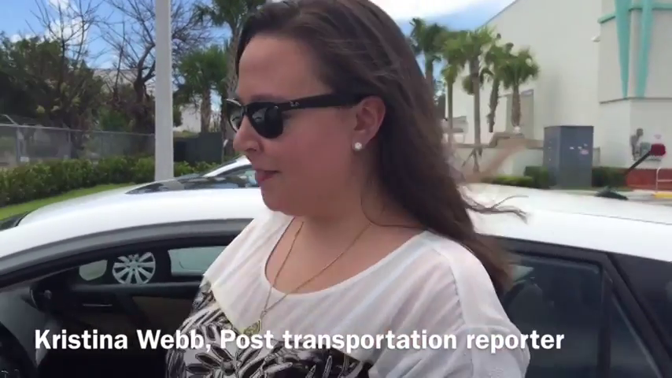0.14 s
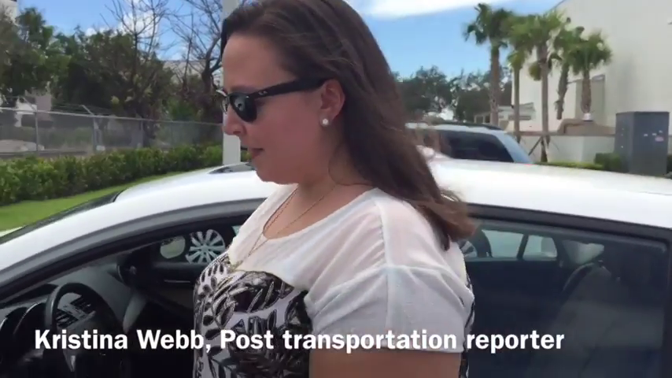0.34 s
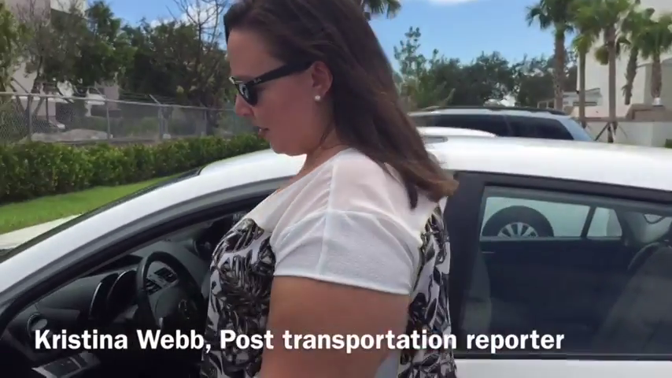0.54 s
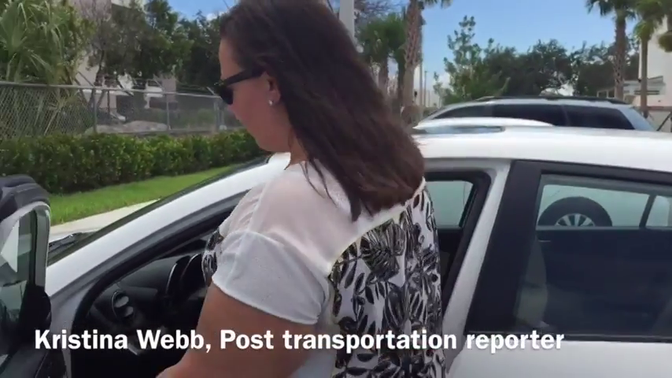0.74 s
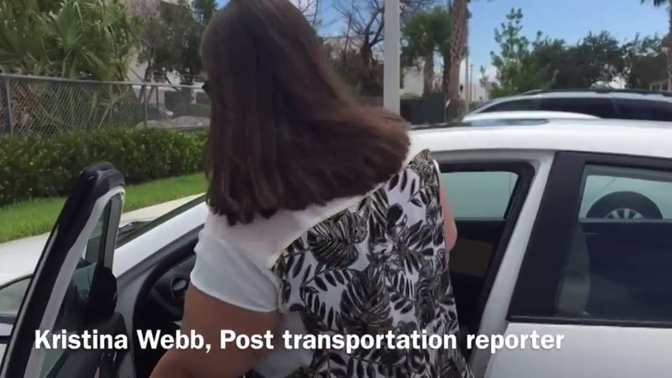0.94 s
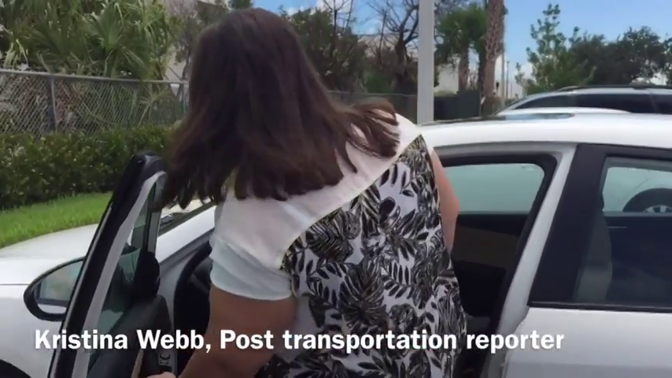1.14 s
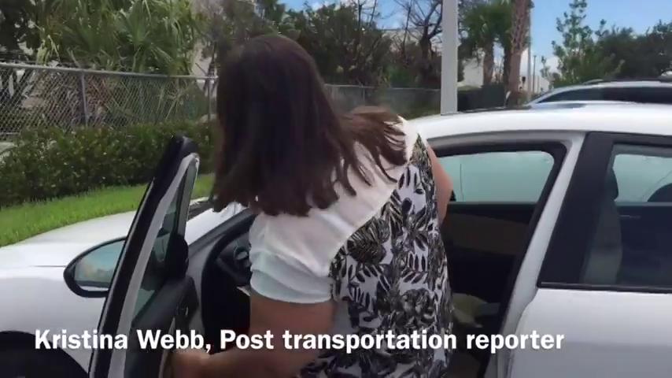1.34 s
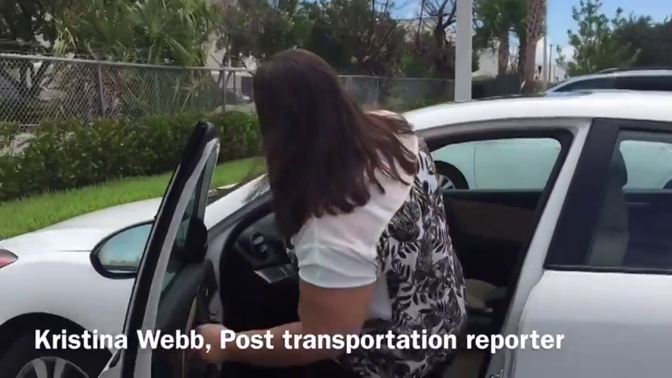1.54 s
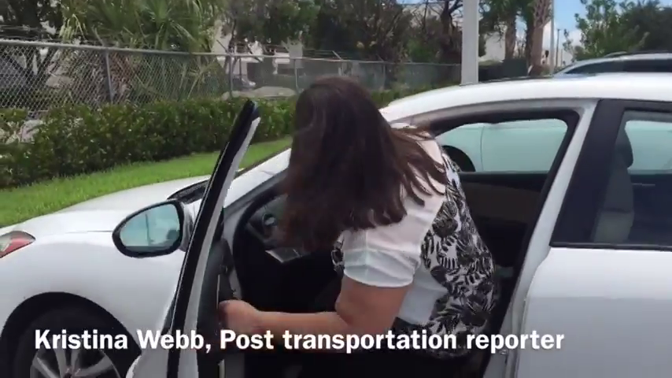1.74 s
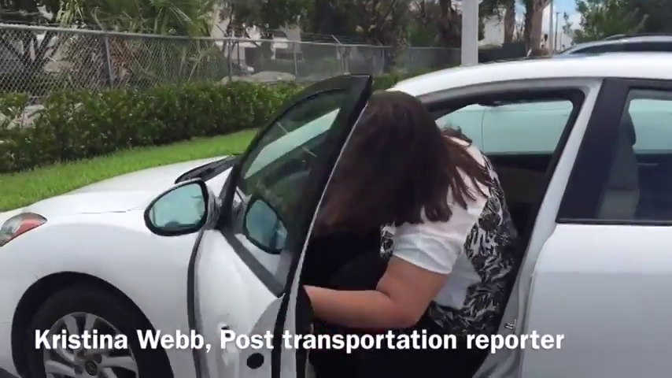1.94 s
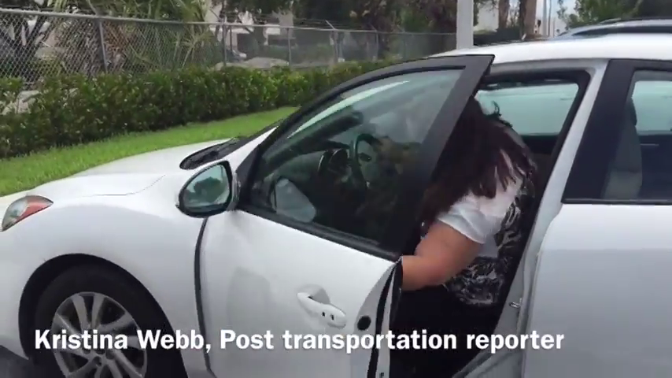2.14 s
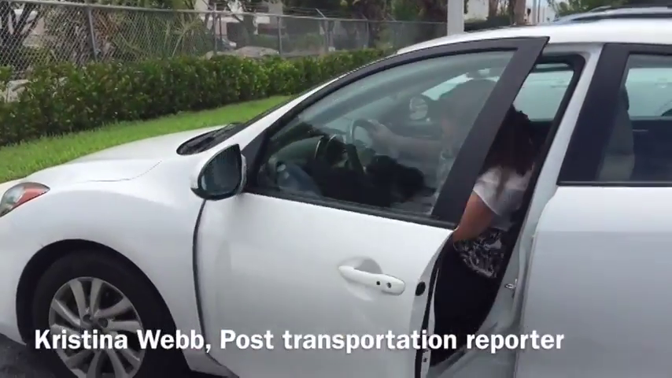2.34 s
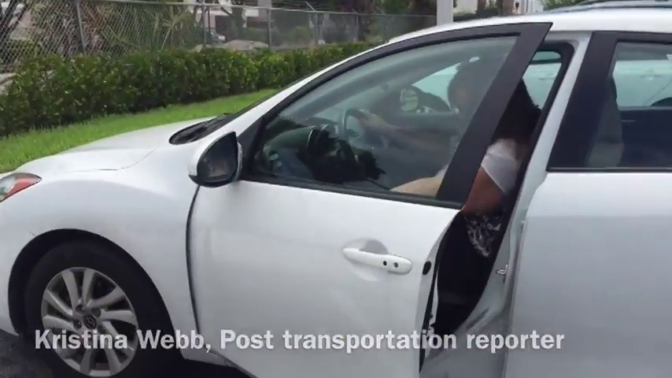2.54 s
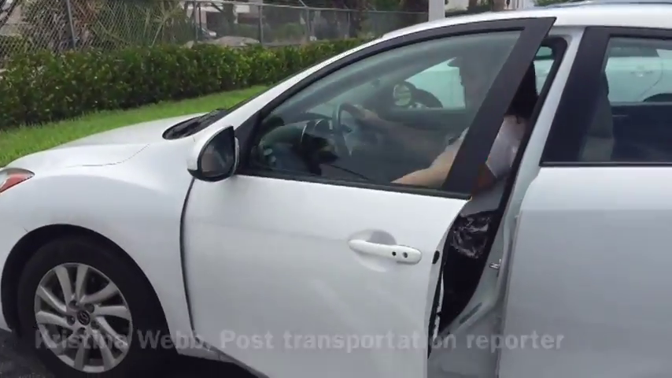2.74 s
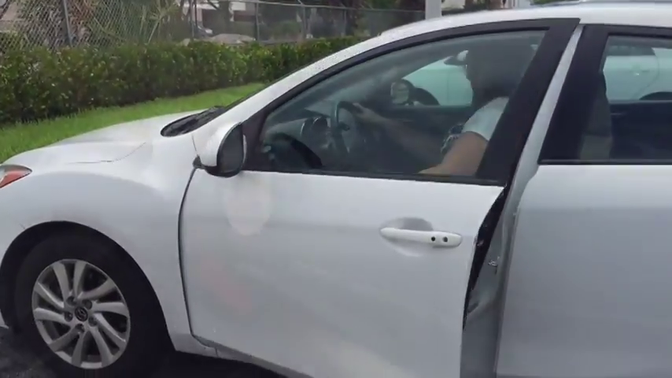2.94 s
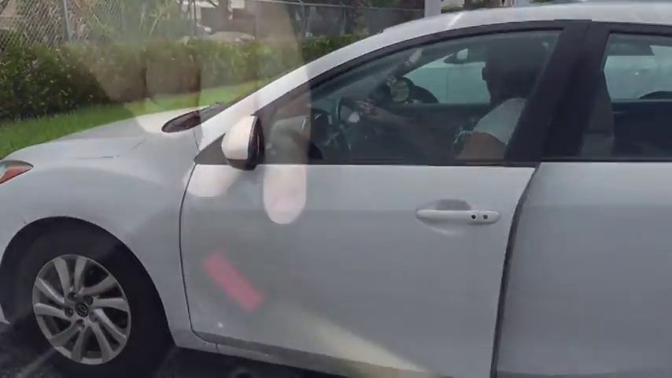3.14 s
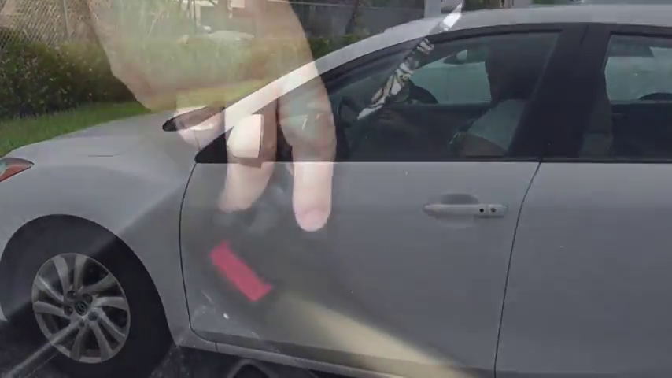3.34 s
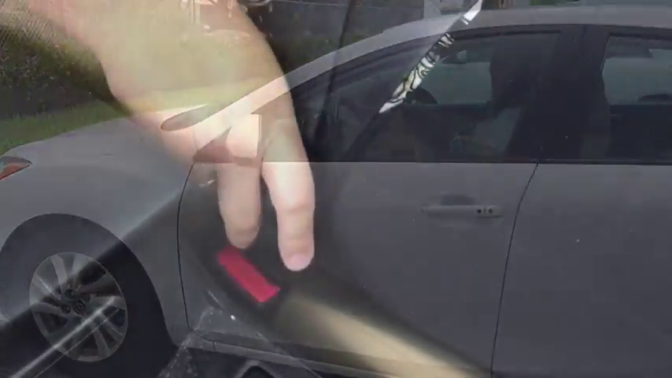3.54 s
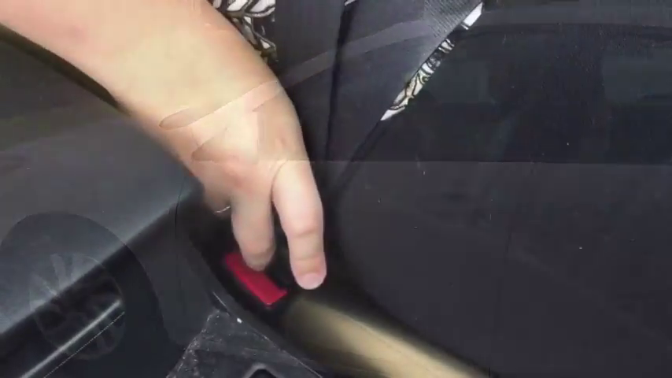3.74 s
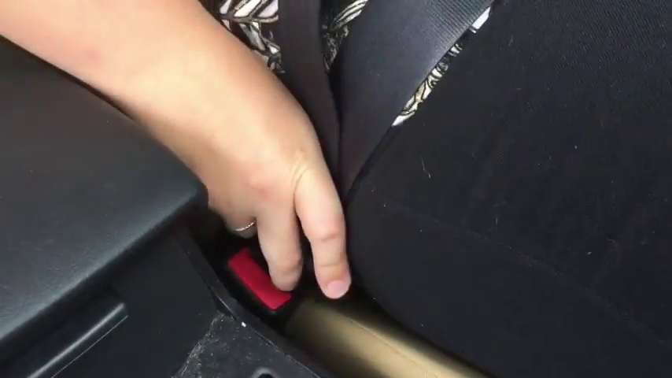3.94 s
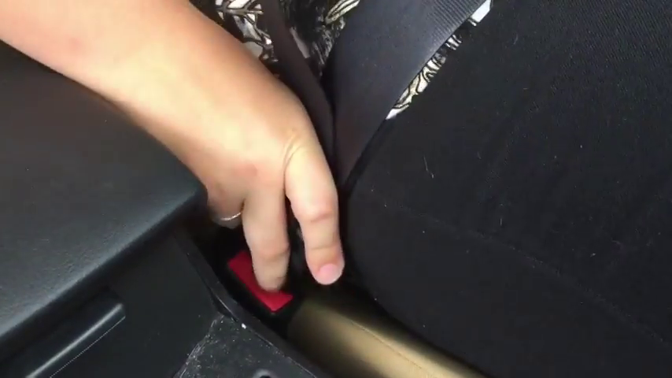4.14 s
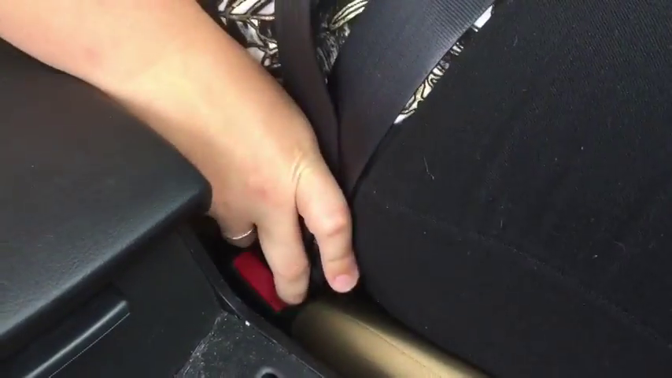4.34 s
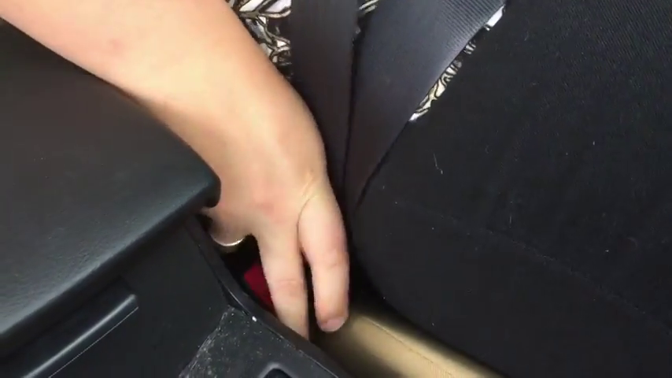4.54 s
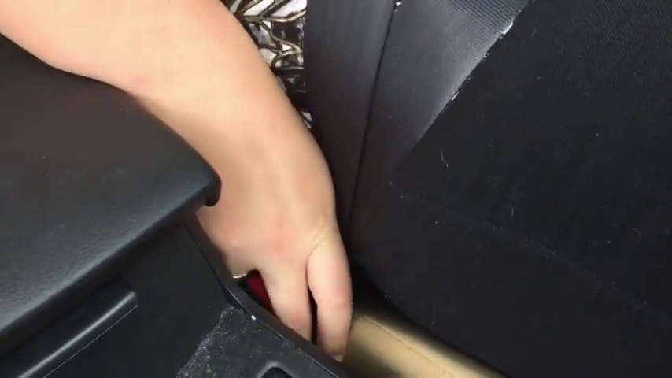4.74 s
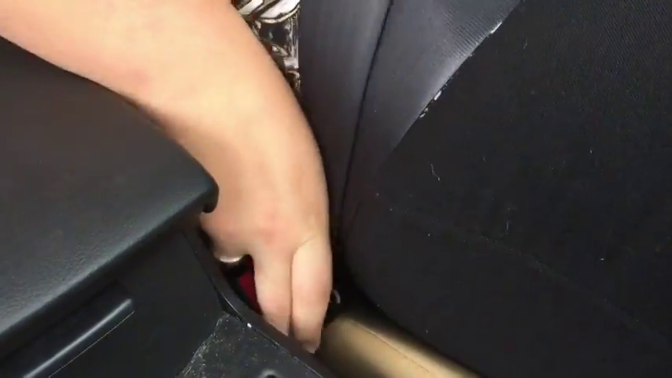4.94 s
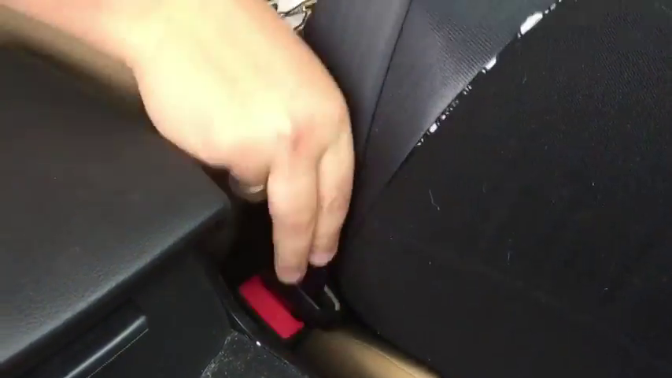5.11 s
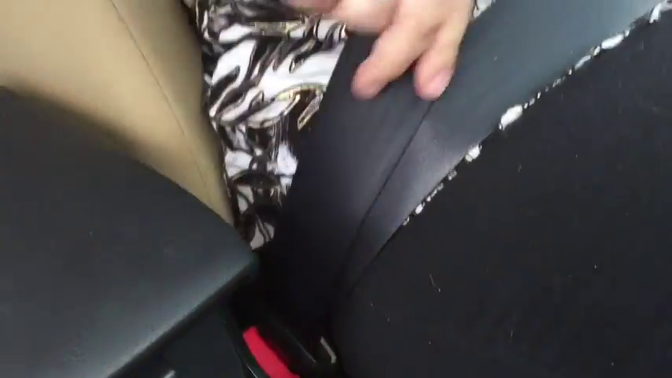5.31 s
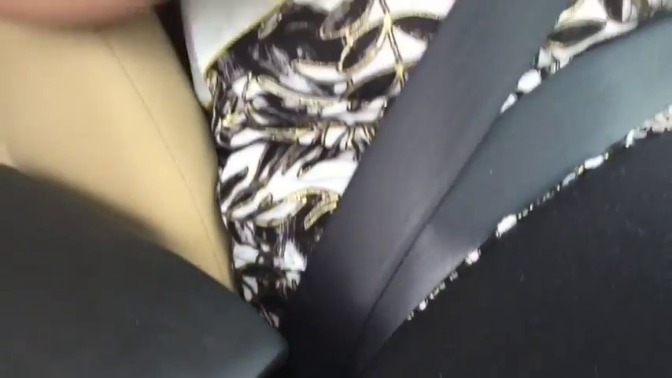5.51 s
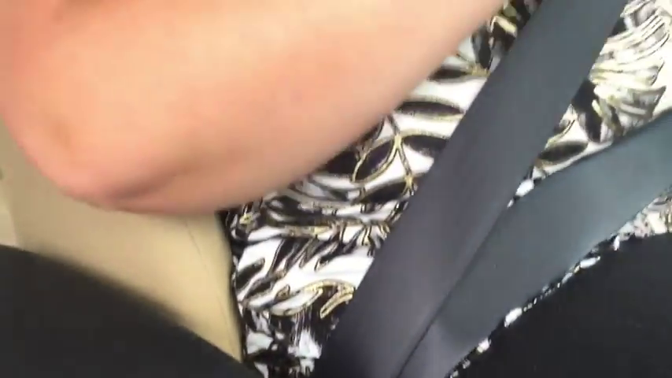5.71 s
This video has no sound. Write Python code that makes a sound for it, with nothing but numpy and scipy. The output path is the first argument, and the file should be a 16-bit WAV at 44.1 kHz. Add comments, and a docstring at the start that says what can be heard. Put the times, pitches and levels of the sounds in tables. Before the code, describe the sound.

Car engine running, dry door-hinge cracks, a heavy door slam, then knocks on a seat belt buckle, a loud latch snap and cloth rubbing.

```python
"""A small car idles in a parking lot while the driver climbs in and pulls the creaking door: noise scuffs, dry cracks.
The door slams: struck metal modes ring over bursts of noise. Meanwhile the sound cross-fades to the cabin,
where the idle is a low drone of shaped noise and steady tones. Fingers knock on the seat belt buckle, its steel
latch snaps loudly (both are ringing modes with noise), and the webbing slides over clothes as grainy noise."""
import sys
import numpy as np
from scipy import signal
from scipy.fft import rfft, irfft, next_fast_len
from scipy.io import wavfile

SR = 44100
rng = np.random.default_rng(int(sys.argv[2]) if len(sys.argv) > 2 else 0)


def to_wav(s):
    """Save 16-bit WAV."""
    ch = np.atleast_2d(s).T  # columns
    pcm = np.round(np.clip(ch, -1, 1) * 32767)  # PCM
    wavfile.write(sys.argv[1], SR, pcm.astype(np.int16))


N = 258867
TIME = np.arange(N) / SR
RING = TIME[:SR // 2]  # half a second, the time axis of every struck sound
TOP_HZ = 15900  # top of the recorder's range

# blows of the slam: t/s, latch level/dB, loose parts level/dB, panel level/dB
SLAM_BLOWS = [(3.38, -32, -27, -36), (3.398, -6, -16.5, -24.5), (3.401, -9, -15, -17),
              (3.413, -31, -31, -23), (3.4284, -30, -23.5, -29), (3.436, -31, -31, -40),
              (3.47, -47, -39, -39), (3.496, -50, -40, -40)]
# ringing shapes of the door's sheet metal: f/Hz, level/dB, t60/s
PANEL_MODES = [(50, -2.5, 0.38), (74, -4.5, 0.23), (122.6, -2, 0.216), (170, 2.5, 0.24), (239, -5, 0.16),
               (322.6, -6, 0.24), (383, -9.5, 0.11), (480, -20, 0.18), (678, -10.5, 0.16)]
# ringing shapes of the door latch: f/Hz, level/dB, t60/s
LATCH_MODES = [(833, 4, 0.026), (955, 7, 0.023), (1066, 9, 0.027), (1158, 7, 0.029), (1283, 3, 0.019),
               (1455, 1, 0.018), (1600, 1.5, 0.024), (4140, -7, 0.03)]
# noise of the loose parts in the door: f/Hz, level/dB
LOOSE_SPECTRUM = [(200, 6), (600, 0), (1000, -4), (1550, 2.5), (2100, -10.5), (2900, -11.5), (4500, -15),
                  (7000, -25.5), (11000, -29), (16000, -39)]


def door_slam():
    """The latch catches in two hard clacks, the panel booms and loose parts inside the door rattle after it."""
    out = np.zeros(N)
    cushion = np.minimum(RING / 0.0025, 1)  # the seal spreads each blow over a few milliseconds
    for s, latch_db, loose_db, panel_db in SLAM_BLOWS:
        loose = noise(LOOSE_SPECTRUM, size=len(RING)) * (decay(0.03) + undb(-15) * decay(0.15))
        latch = ring(LATCH_MODES, detune=0.017)
        panel = ring(PANEL_MODES, detune=0.019)
        blow = undb(latch_db) * latch + undb(loose_db) * loose + undb(panel_db) * panel
        add(out, s, cushion * blow)
    return out


# rubbing of door, hinge and seat: t/s at the peak, level/dB, t60/s, brightest f/Hz, fall-off in dB per octave
SCUFF_EVENTS = [(0.679, -41.5, 0.31, 400, 72), (1.104, -39, 0.082, 1900, 13), (1.252, -40, 0.17, 1500, 9.5),
                (1.59, -36, 0.1, 370, 14), (1.734, -37.5, 0.12, 3200, 6), (1.761, -34, .17, 4400, 4),
                (1.779, -35.5, 0.088, 1400, 6), (1.932, -39, 0.2, 1600, 9), (1.972, -46.5, .1, 4000, 16),
                (2.066, -44, .12, 850, 12)]
# sharp cracks of the door's hinge stop: t/s, level/dB, brightest f/Hz
HINGE_CRACKS = [(1.0988, -33, 3800), (1.115, -37, 4500), (1.733, -25, 4600), (1.739, -33, 3800),
                (1.7513, -17, 4600), (1.7558, -26, 7000), (1.761, -17.5, 4500), (1.7659, -22, 4000),
                (1.772, -19.5, 1300), (1.7763, -28, 2400), (1.782, -27, 4000), (1.793, -25, 2000)]
# ringing shapes of the hinge stop: f/Hz, level/dB, t60/s
HINGE_MODES = [(1400, 7, 0.0048), (2150, 0, .006), (3590, -4.5, 0.0092), (4660, 0, 0.0051),
               (5640, -7, 0.0048), (7750, 1, 0.0043), (8600, 1, 0.0049), (10400, 0.5, 0.0033)]
SCUFF_RISE_SHARE, SCUFF_GRAIN_DB = .11, 2  # rise time as a share of the t60; roughness
CRACK_T60_S, CRACK_SLOPE_DB = .007, 6.5  # slope per octave away from the brightest range
CRACK_GRIT_DB = -11  # noise beside the modes
SKIN_HZ, SKIN_DB, DOOR_TOP_HZ = 1450, -4.5, 11600


def door_handling():
    """Grainy scuffs swell and die away; the hinge stop lets go in a few dry cracks."""
    out = np.zeros(N)
    for s, db, t60, hz, slope_db in SCUFF_EVENTS:
        rise_s = SCUFF_RISE_SHARE * t60
        # the factor makes the decay meet the rise at full level
        envelope = np.minimum(RING / rise_s, decay(t60) * 1000 ** SCUFF_RISE_SHARE)
        add(out, s - rise_s, undb(db) * burst(hz, slope_db) * envelope)
    out = out * unit(undb(SCUFF_GRAIN_DB * walk(600)))
    for s, db, hz in HINGE_CRACKS:
        grit = undb(CRACK_GRIT_DB) * burst(hz, CRACK_SLOPE_DB) * decay(CRACK_T60_S)
        crack = ring(HINGE_MODES, hz, CRACK_SLOPE_DB, detune=0.035) + grit
        add(out, s, undb(db) * crack)
    # the door skin is shaken too, which gives each sound some body
    skin = undb(SKIN_DB) * dull(out, SKIN_HZ, order=1)
    return dull(out, DOOR_TOP_HZ, order=3) + skin


# rattles of handle and trim: t/s, level/dB
TRIM_RATTLES = [(1.238, -33), (1.2455, -33), (1.2505, -32), (1.257, -37), (1.9225, -36), (1.9284, -25),
                (1.942, -32), (3.555, -40), (3.564, -36)]
# ringing shapes of the trim: f/Hz, level/dB, t60/s
TRIM_MODES = [(1000, -2, 0.015), (1300, -5, 0.017), (1850, -2, 0.016), (2105, 2, 0.026), (2330, -1, 0.026),
              (2440, -3, 0.021)]
BOUNCE_S, BOUNCE_DB = .003, -6.5  # a loose part strikes again, weaker each time


def door_trim():
    """Handle and plastic door trim chatter in short hollow knocks, each with two uneven bounces."""
    out = np.zeros(N)
    soft_start = np.minimum(RING / .001, 1)
    for s, db in TRIM_RATTLES:
        for bounce in range(3):
            late_s = BOUNCE_S * bounce * rng.uniform(.75, 1.25)
            gain = undb(db + bounce * BOUNCE_DB)
            add(out, s + late_s, gain * ring(TRIM_MODES, detune=.03) * soft_start)
    return out


# the rubber seal slips as the door settles: t/s at the middle, length/s, level/dB, pitch f/Hz
SEAL_GRUNTS = [(3.453, .02, -40, 430), (3.474, 0.011, -38.5, 620), (3.499, 0.0081, -38, 636),
               (3.509, 0.015, -36, 513), (3.527, .02, -42.5, 460)]
SEAL_SLOPE_DB = 30  # per octave away from the pitch


def door_seal():
    """Rubber slips on the frame in a few short rough grunts, each a hump of noise around its own pitch."""
    out = np.zeros(N)
    for s, length_s, db, hz in SEAL_GRUNTS:
        out += undb(db) * bell(s, length_s) * noise(hump(hz, SEAL_SLOPE_DB))
    return out


# the catch slips, the spring drives the steel home, and it rebounds into the housing
SNAP_S, SNAP_DB, SNAP_HARDNESS_DB = 4.8802, -19.5, 15.5
SNAP_HZ, SNAP_SLOPE_DB = 2290, 15.5  # favoured frequency, fall-off per octave around it
SLIP_LEAD_S, SLIP_DB = 0.0023, -15  # before the snap, relative to it
REBOUND_S, REBOUND_DB = .0019, -11.5  # delay after the snap; its own level
REBOUND_HZ, REBOUND_HARDNESS_DB = 930, -6.5
# the steel modes ring out in the snap and stay damped in other blows
SNAP_STEEL_DB, KNOCK_STEEL_DB = 0.5, -14.5
SPRING_HZ, SPRING_DB, SPRING_T60_S = 6164, -51, .25  # thin ring of the latch spring


def latch_snap():
    """The catch slips, the steel latch springs home and rebounds within a few milliseconds; its spring rings on."""
    out = np.zeros(N)
    slip = knock(SNAP_HZ, SNAP_SLOPE_DB, SNAP_HARDNESS_DB, KNOCK_STEEL_DB)
    add(out, SNAP_S - SLIP_LEAD_S, undb(SNAP_DB + SLIP_DB) * slip)
    snap = knock(SNAP_HZ, SNAP_SLOPE_DB, SNAP_HARDNESS_DB, SNAP_STEEL_DB)
    add(out, SNAP_S, undb(SNAP_DB) * snap)
    rebound = knock(REBOUND_HZ, SNAP_SLOPE_DB, REBOUND_HARDNESS_DB, KNOCK_STEEL_DB)
    add(out, SNAP_S + REBOUND_S, undb(REBOUND_DB) * rebound)
    spring = np.sin(2 * np.pi * SPRING_HZ * RING) * decay(SPRING_T60_S)
    add(out, SNAP_S, undb(SPRING_DB) * spring)
    return out


# knocks on the buckle: t/s, level/dB, favoured f/Hz, fall-off in dB per octave around it,
# hardness (steel over housing) level/dB
BUCKLE_KNOCKS = [(3.734, -43.5, 3340, 15, 0), (3.8022, -29.5, 3300, 9, -5), (3.805, -33.5, 1900, -2, -7),
                 (3.808, -25.5, 560, 6, -12), (3.97, -46, 3100, 22, -8), (4.17, -28.5, 1250, 6, -19),
                 (4.244, -34, 1200, 10, -17), (4.249, -25.5, 1200, 24, -20), (4.25, -37, 2800, 30, -14),
                 (4.3814, -17, 1140, 8, -8), (4.4172, -25, 2620, 34, -10.5), (4.459, -43, 2700, 18, -9),
                 (4.7073, -23.5, 2050, 22, 0), (4.849, -23.5, 1090, 12, -15), (4.8631, -30, 1000, 13, -4.5),
                 (4.867, -31.5, 1000, 12.5, -2), (4.871, -35, 1000, 12, -8.5),
                 (5.046, -33.5, 2780, 13, 4.5), (5.0489, -25.5, 1730, 17, -1.5),
                 (5.109, -27.5, 1080, 11, -10.5), (5.359, -27, 420, 15, -25), (5.388, -32.5, 850, 18, -9),
                 (5.475, -34, 550, 20, -20), (5.646, -33, 675, 25, -16)]


def buckle():
    """Fingers and belt tongue knock on the buckle, each blow with its own place and hardness."""
    out = np.zeros(N)
    for s, db, hz, slope_db, hardness_db in BUCKLE_KNOCKS:
        add(out, s, undb(db) * knock(hz, slope_db, hardness_db, KNOCK_STEEL_DB))
    return out


# ringing shapes of the buckle's plastic housing: f/Hz, level/dB, t60/s
HOUSING_MODES = [(315, 0, 0.096), (368, -2.5, 0.043), (660, 1, 0.02), (872, -4.5, 0.038), (984, -6, 0.055),
                 (1112, 3, 0.031), (1240, -1.5, 0.032), (1506, -0.5, 0.024), (2080, -10, 0.03),
                 (2620, -1, 0.023), (2760, 0, 0.018), (3100, -5, 0.022), (3270, -4, 0.015),
                 (3580, -9, 0.03)]
# ringing shapes of the steel inside it: f/Hz, level/dB, t60/s
STEEL_MODES = [(2600, -2, 0.027), (2760, 0, 0.025), (3250, -4, 0.02), (3960, -8, 0.03), (4310, -10.5, 0.03),
               (5960, -3.5, 0.017), (6850, -1.5, 0.018), (7220, 11.5, 0.015), (7370, -10, 0.055),
               (7640, 8.5, 0.017), (8400, -5.5, 0.025), (10460, 6, 0.011), (10900, 3, 0.014),
               (11300, -4.5, 0.02), (11820, 0, 0.02), (12300, -4, 0.017), (14140, -3.5, .02)]
# noise of the steel contact: f/Hz, level/dB
STEEL_NOISE = [(300, -19), (1000, -6.5), (2700, 3), (3700, -4.5), (5200, -3), (6400, 2), (7500, -4.5),
               (9200, -2), (10700, -8.5), (14000, -3.5), (16000, -16.5)]
HOUSING_RISE_S = .0005  # the ring takes a moment to spread through the plastic
# a harder contact is shorter and so reaches higher: its top doubles with each HARDNESS_PER_OCT_DB
CONTACT_HZ, HARDNESS_PER_OCT_DB, SOFTEST_HZ = 12100, 8.5, 2600
# after each knock the buckle rocks on its stalk with a dull thud
THUD_DELAY_S, THUD_DB, THUD_HZ = 0.0042, -13.5, 400


def knock(hz, slope_db, hardness_db, steel_db):
    """One blow rings the plastic housing; the harder it is, the more it shakes the sprung steel inside."""
    crack = noise(STEEL_NOISE, size=len(RING)) * (decay(0.018) + undb(-27.5) * decay(0.076))
    latch = undb(steel_db) * ring(STEEL_MODES, detune=.002)
    steel = undb(hardness_db) * (latch + undb(-2.5) * crack)
    housing = ring(HOUSING_MODES, hz, slope_db, detune=0.0065) * (1 - np.exp(-RING / HOUSING_RISE_S))
    top_hz = np.clip(CONTACT_HZ * 2 ** (hardness_db / HARDNESS_PER_OCT_DB), SOFTEST_HZ, TOP_HZ)
    out = dull(housing + steel, top_hz)
    add(out, THUD_DELAY_S, undb(THUD_DB) * ring(HOUSING_MODES, THUD_HZ, slope_db=15.0))
    return out


# pulls of the belt: t/s at the middle, length/s, webbing hiss level/dB, clothes rustle level/dB
BELT_PULLS = [(4.722, 0.049, -57.5, -41), (4.829, 0.06, -52, -41), (4.882, 0.043, -50, -38),
              (4.944, .02, -55, -53.5), (5.085, 0.036, -45, -44.5), (5.216, 0.16, -57.5, -47),
              (5.395, 0.08, -56.5, -41.5), (5.502, 0.15, -55.5, -46), (5.652, 0.038, -55.5, -42),
              (5.76, 0.27, -63.5, -49)]
# hiss of the woven webbing: f/Hz, level/dB
WEBBING_SPECTRUM = [(1500, -12), (3500, -5), (6000, -1.5), (9000, 0), (11000, -4), (14000, -3.5),
                    (16000, -13.5)]
# rustle of the clothes: f/Hz, level/dB
CLOTHES_SPECTRUM = [(120, 11), (350, -2), (600, 2), (900, 0.5), (1300, -4), (2000, -6.5), (2900, -11.5),
                    (4200, -15), (5200, -23.5), (9000, -44)]
# folds of cloth that catch and let go: rate, scatter of their sizes, share of the rustle's power
CATCHES_PER_S, CATCH_SPREAD_DB, CATCH_SHARE = 350, 3, .45


def belt():
    """With each pull the woven webbing hisses and clothes rustle: dense tiny slips that come in uneven scuffs."""
    hiss_power = sum((undb(db) * bell(s, length_s)) ** 2 for s, length_s, db, _ in BELT_PULLS)
    rustle_power = sum((undb(db) * bell(s, length_s)) ** 2 for s, length_s, _, db in BELT_PULLS)
    weave = rng.standard_normal(N) * undb(1.4 * walk(580) + 0.63 * walk(35))
    folds = rng.standard_normal(N) * undb(2.8 * walk(260) + 1.6 * walk(45))
    catches = grains(CATCHES_PER_S, CATCH_SPREAD_DB)
    cloth = np.sqrt(1 - CATCH_SHARE) * unit(folds) + np.sqrt(CATCH_SHARE) * catches
    hiss = np.sqrt(hiss_power) * colour(weave, WEBBING_SPECTRUM)
    rustle = np.sqrt(rustle_power) * colour(cloth, CLOTHES_SPECTRUM)
    return hiss + rustle


# rasps of the belt edge: t/s at the middle, length/s, level/dB, brightest f/Hz
EDGE_RASPS = [(5.287, 0.057, -55.5, 3100), (5.385, 0.03, -50.5, 2500), (5.427, 0.022, -48, 2880),
              (5.48, 0.03, -55, 2300), (5.586, 0.047, -51, 2380), (5.651, 0.037, -48, 2430),
              (5.818, 0.044, -59, 2500)]
SLIPS_PER_S, SLIP_SPREAD_DB = 1100, 3.5
RASP_SLOPE_DB = 19  # per octave away from the brightest range


def belt_edge():
    """The edge of the webbing catches and slips on cloth, thread by thread, in short grainy rasps."""
    slips = grains(SLIPS_PER_S, SLIP_SPREAD_DB)
    out = np.zeros(N)
    for s, length_s, db, hz in EDGE_RASPS:
        out += undb(db) * bell(s, length_s) * colour(slips, hump(hz, RASP_SLOPE_DB))
    return out


# drone of the idle in the cabin: f/Hz, level/dB per Hz
CABIN_SPECTRUM = [(25, -10.5), (38, -13.5), (50, 7.5), (78, -3.5), (110, 2.5), (190, -9), (310, -6),
                  (450, -16), (1000, -17.5), (1900, -27.5), (2800, -34), (4500, -45.5), (9000, -50.5),
                  (15500, -58)]
# steady tones of the engine: multiple of the firing rate, outside level/dB, cabin level/dB
ENGINE_ORDERS = [(2, -64, -53), (3, -48.5, -71), (4, -79, -48), (5, -74, -54), (6, -42, -57)]
CABIN_DB, FIRING_HZ = -37.5, 24.17
# cross-fade from outside to the cabin
FADE_START_S, FADE_END_S, CABIN_FADE_POWER = 3.03, 3.955, 0.88


def idle():
    """The engine from outside gives way to its drone in the cabin; the firing orders sound in both."""
    fade = np.clip((TIME - FADE_START_S) / (FADE_END_S - FADE_START_S), 0, 1)
    outside, inside = 1 - fade, fade ** CABIN_FADE_POWER
    drone = noise(CABIN_SPECTRUM) * undb(CABIN_DB + 1.2 * walk(11))
    out = outside * engine_outside() + inside * drone
    for multiple, out_db, in_db in ENGINE_ORDERS:
        gain = outside * undb(out_db) + inside * undb(in_db)
        out = out + gain * tone(round(multiple) * FIRING_HZ, waver_db=2.5, drift=0.48)
    return out


# low rumble of the engine: f/Hz, level/dB per Hz
RUMBLE_SPECTRUM = [(22, -32), (35, -9), (48, 1.5), (75, 4), (110, -0.5), (170, 0.5), (220, 0.5), (320, -7),
                   (450, -18.5), (900, -25.5)]
# exhaust: f/Hz, level/dB per Hz
BOOM_SPECTRUM = [(45, -15), (72, 0), (115, -1), (160, -8.5), (250, -25.5)]
# course of the exhaust boom: t/s, level/dB
BOOM_COURSE = [(0, -39), (.45, -50), (.85, -38), (1.25, -66), (1.62, -31), (1.8, -44), (2.0, -29.5),
               (2.4, -35), (3.3, -33.5)]
# air from the cooling fan: f/Hz, level/dB per Hz
RUSH_SPECTRUM = [(200, -42), (400, 2.5), (520, 2), (720, -0.5), (1000, 1), (1500, 1), (2100, -5),
                 (3000, -13), (4200, -22.5), (7000, -52), (14000, -37), (16000, -44)]
# course of that rush of air: t/s, level/dB
RUSH_COURSE = [(0, -43), (.35, -43.5), (1.4, -43), (2.05, -40.5), (3.1, -41.5)]
# belts and air in the engine bay: f/Hz, level/dB per Hz
BAY_SPECTRUM = [(1800, 4), (2500, 1.5), (2950, -6), (3350, 4.5), (3800, 2), (4300, -0.5), (5200, -2.5),
                (6000, -5.5), (7500, -10), (9300, -6.5), (10500, -13), (12000, -11.5), (14000, -17),
                (16000, -28)]
# cooling fan and belt-driven pulleys: f/Hz, level/dB
WHINE_TONES = [(147, -48.5), (269, -41), (387, -62), (538, -57.5), (614, -57.5)]
# echoes off the asphalt and the car body: delay t/s, level/dB
GROUND_ECHOES = [(.0029, -41), (.0052, -21.5), (.0083, -14.5)]
RUMBLE_DB, BAY_DB = -37, -52
# the microphone comes round to the engine bay: its hiss starts lower by this much
APPROACH_S, BAY_RISE_DB = 2.22, 6.5


def engine_outside():
    """Exhaust boom, rush of air, whining fan and pulleys, and hiss with injector ticks from the engine bay."""
    far = np.maximum(1 - TIME / APPROACH_S, 0)
    boom_db, = curves(BOOM_COURSE)
    rush_db, = curves(RUSH_COURSE)
    bay = undb(BAY_DB - BAY_RISE_DB * far) * (noise(BAY_SPECTRUM) + injectors())
    rush = noise(RUSH_SPECTRUM) * undb(rush_db + .6 * walk(14))
    rumble = noise(RUMBLE_SPECTRUM) * undb(RUMBLE_DB + 0.82 * walk(12))
    boom = noise(BOOM_SPECTRUM) * undb(boom_db)
    whines = sum(undb(db) * tone(hz, waver_db=2, drift=0.8) for hz, db in WHINE_TONES)
    return reflect(bay + rush, GROUND_ECHOES) + rumble + boom + whines


# injectors in firing order: level/dB relative to the hiss of the bay (before the spit shape), brightest f/Hz
INJECTOR_CYLINDERS = [(2, 8800), (-0.5, 9100), (1, 7000), (2, 13000)]
# hiss of one spit: f/Hz, level/dB
SPIT_SPECTRUM = [(2600, 1), (3500, 13), (4500, 7.5), (5500, 3), (6700, -10), (8500, 0), (10000, 0.5),
                 (10600, -7), (12000, 0), (13600, -8), (15000, -20)]
FIRST_TICK_S, CYLINDER_SLOPE_DB = .035, 5  # slope per octave away from the brightest range
SPIT_SHARPNESS = 4  # a higher power makes a shorter spit


def injectors():
    """The four injectors spit in turn, once per firing, each with its own strength and colour."""
    cycle = FIRING_HZ * (TIME - FIRST_TICK_S)
    spit = (.5 + .5 * np.cos(2 * np.pi * cycle)) ** SPIT_SHARPNESS * undb(1.2 * walk(24))
    turn = np.round(cycle) % len(INJECTOR_CYLINDERS)
    out = np.zeros(N)
    for k, (db, hz) in enumerate(INJECTOR_CYLINDERS):
        hiss = colour(noise(SPIT_SPECTRUM), hump(hz, CYLINDER_SLOPE_DB))
        out += (turn == k) * undb(db) * hiss
    return spit * out


def reflect(x, echoes):
    """Nearby surfaces add early copies that ripple the spectrum; the power stays about the same."""
    out = x.copy()
    for delay_s, db in echoes:
        add(out, delay_s, undb(db) * x)
    return out / np.sqrt(1 + sum(undb(db) ** 2 for _, db in echoes))


def ring(modes, centre_hz=1000, slope_db=0, detune=0.0039):
    """Struck modes, starting near rms 1; the point of contact favours those near a centre."""
    hz, db, t60 = np.transpose(modes)
    gain = undb(db + favour(hz, centre_hz, slope_db))
    hz = hz * (1 + detune * rng.standard_normal(len(hz)))  # no two blows ring quite alike
    sign = rng.choice([-1, 1], len(hz))
    waves = sum(g * np.sin(2 * np.pi * f * RING) * decay(d) for f, g, d in zip(hz, sign * gain, t60))
    return waves / np.sqrt(np.sum(gain ** 2) / 2)


def tone(hz, waver_db, drift):
    """A machine line at rms 1 that wavers in level and, by drift radians, in phase."""
    phase = 2 * np.pi * np.cumsum(hz * np.ones(N)) / SR + drift * walk(4)
    return unit(np.sin(phase) * undb(waver_db * walk(6.2)))


def grains(per_s, spread_db):
    """Random tiny impulses at rms 1, most small and a few large."""
    size = undb(spread_db * np.minimum(rng.exponential(size=N), 4))
    happens = rng.random(N) < per_s / SR
    return unit(rng.choice([-1, 1], N) * size * happens)


def noise(points, size=N):
    """Coloured noise at rms 1."""
    return colour(rng.standard_normal(size), points)


def burst(hz, slope_db):
    """Half a second of noise that is brightest around one frequency."""
    return noise(hump(hz, slope_db), size=len(RING))


def colour(x, points):
    """Give a signal a spectrum of (Hz, dB) points, at rms 1."""
    hz, db = np.transpose(points)
    size = next_fast_len(len(x))
    f = np.maximum(np.fft.rfftfreq(size, 1 / SR), 1)
    # beyond its ends the spectrum falls away
    skirts = np.minimum(f / hz[0], 1) ** 2 * np.minimum(hz[-1] / f, 1) ** 2
    gain = skirts * undb(np.interp(np.log(f), np.log(hz), db))
    return unit(irfft(rfft(x, size) * gain, size)[:len(x)])


def hump(hz, slope_db):
    """A spectrum of (Hz, dB) points that falls away on both sides of one frequency."""
    bands = np.geomspace(200, 16000, 40)
    return np.column_stack([bands, favour(bands, hz, slope_db)])


def favour(hz, centre_hz, slope_db):
    """Level in dB that falls with the octaves away from a centre."""
    return -slope_db * np.abs(np.log2(hz / centre_hz))


def dull(x, top_hz, order=2):
    """Low-pass: a softer, longer contact excites less treble."""
    return signal.sosfilt(signal.butter(order, min(top_hz, .45 * SR), fs=SR, output="sos"), x)


def decay(t60):
    """Envelope of a free ring, 60 dB down after t60 seconds."""
    return np.exp(-np.log(1000) * RING / t60)


def bell(s, length_s):
    """A smooth rise and fall around a time, above half power for its length."""
    return .5 ** (2 * ((TIME - s) / length_s) ** 2)


def walk(rate):
    """Smooth chance with spread 1, changing about rate times a second."""
    steps = rng.standard_normal(8192)
    return unit(np.interp(TIME * rate, np.arange(len(steps)), steps))


def curves(table):
    """The columns of a table of timed rows, one value per sample."""
    s, *columns = np.transpose(table)
    return [np.interp(TIME, s, c) for c in columns]


def add(out, s, sound):
    """Mix a sound in at a time."""
    i = int(s * SR)
    out[i:i + len(sound)] += sound[:len(out) - i]


def undb(db):
    """Decibels to gain."""
    return 10 ** (np.asarray(db) / 20)


def unit(x):
    """Scale to rms 1."""
    return x / np.sqrt(np.mean(x ** 2))


# early echoes off console, seat and windows: delay t/s, level/dB
INDOOR_ECHOES = [(.0023, -15.5), (.0041, -23.5), (.0067, -17.5), (.0098, -17)]


def scene():
    """Door, buckle, belt and engine at one microphone."""
    door = door_slam() + door_handling() + door_trim() + door_seal()
    seat_belt = latch_snap() + buckle() + belt() + belt_edge()
    return (door + reflect(seat_belt, INDOOR_ECHOES) + idle())[None]


def record(dry):
    """The recorder clips at full scale and cuts the top."""
    lowpass = signal.ellip(8, .2, 70, TOP_HZ, fs=SR, output="sos")
    return signal.sosfilt(lowpass, np.clip(dry, -1, 1))


dry = scene()
out = record(dry)
to_wav(out)
```